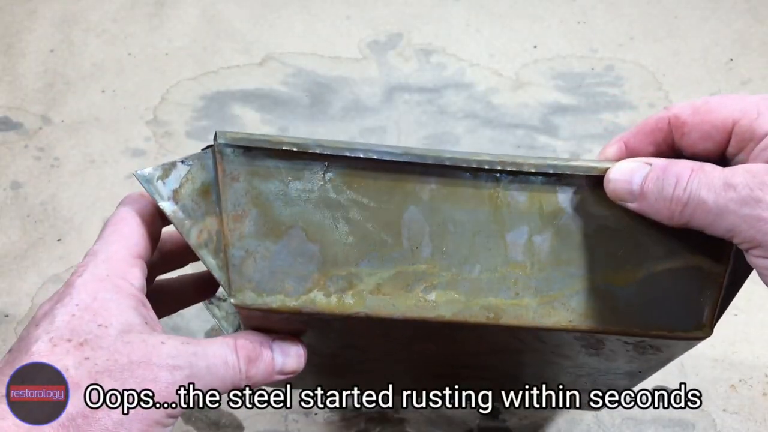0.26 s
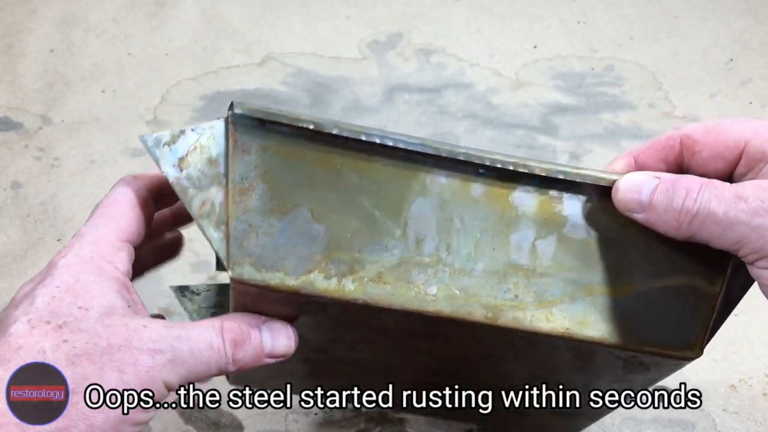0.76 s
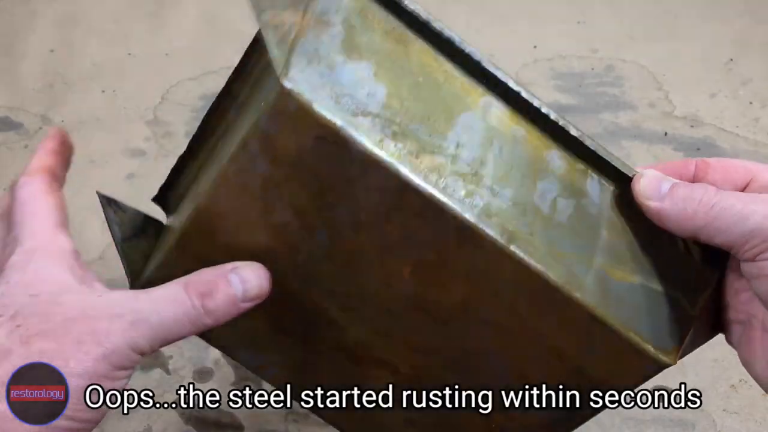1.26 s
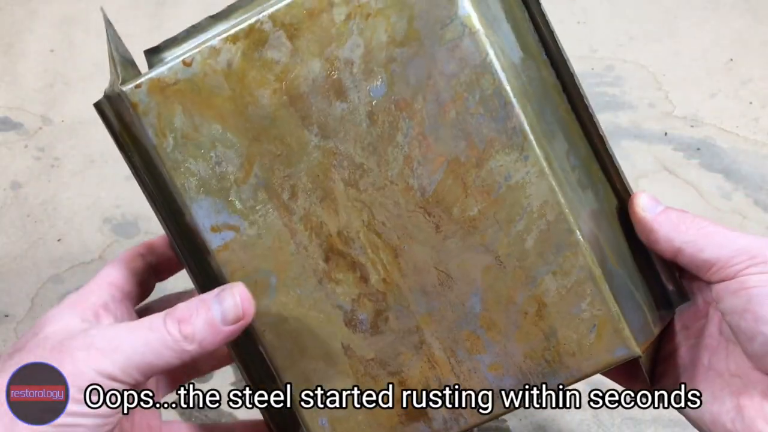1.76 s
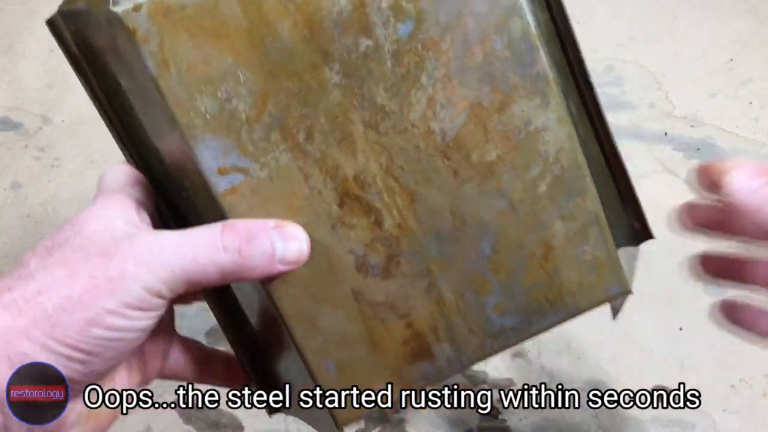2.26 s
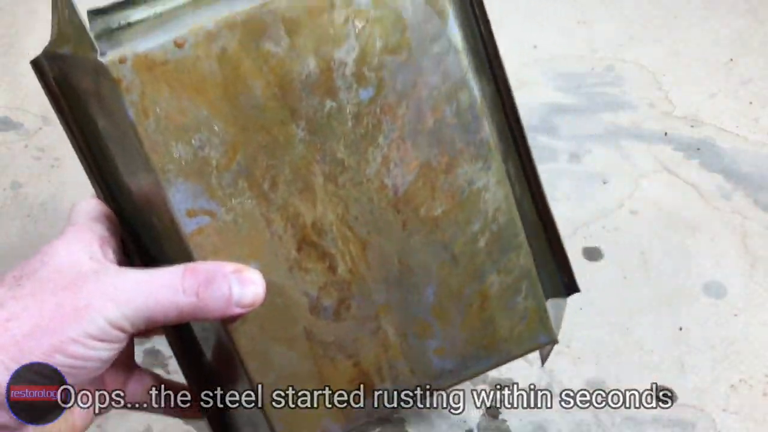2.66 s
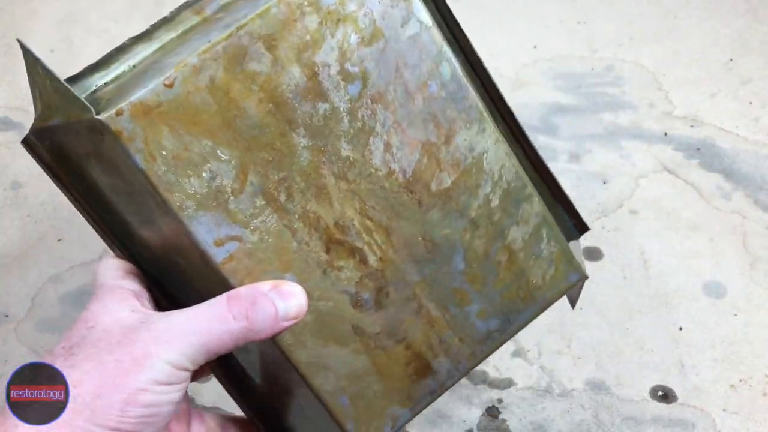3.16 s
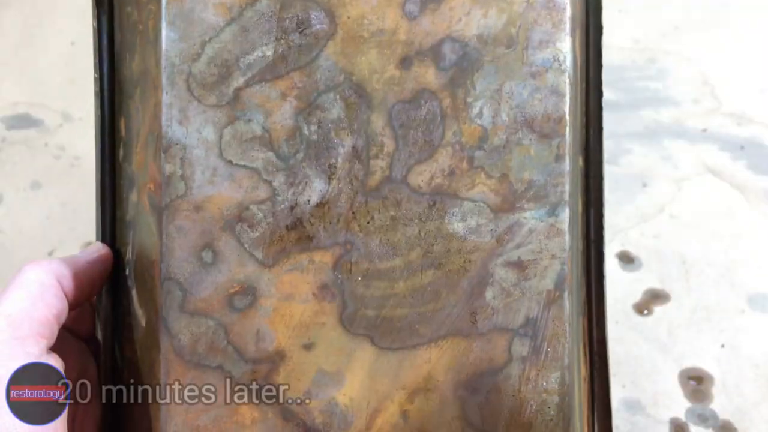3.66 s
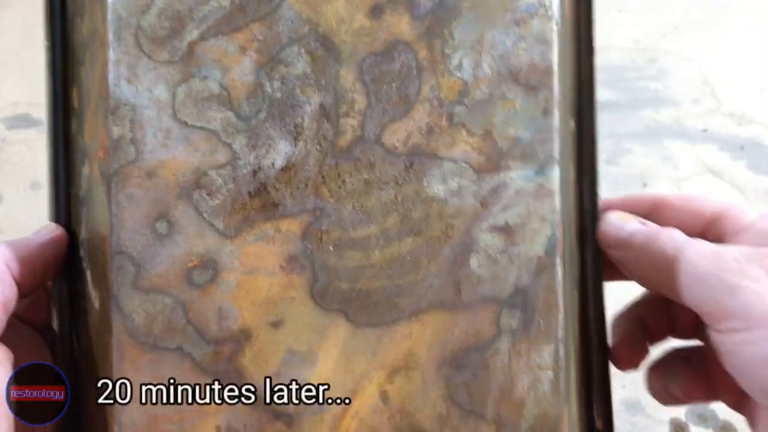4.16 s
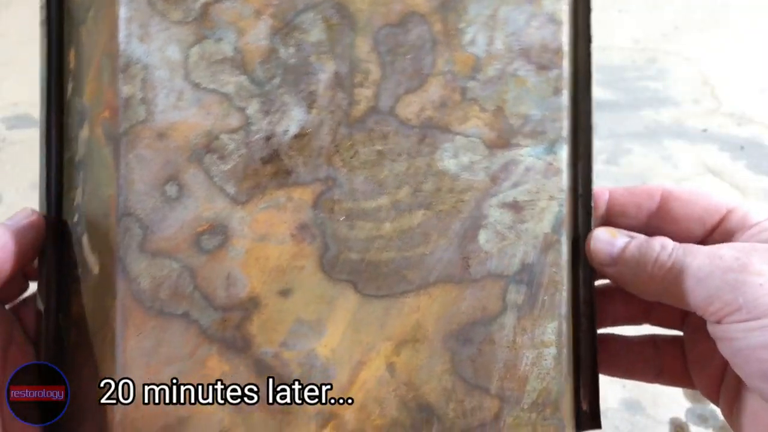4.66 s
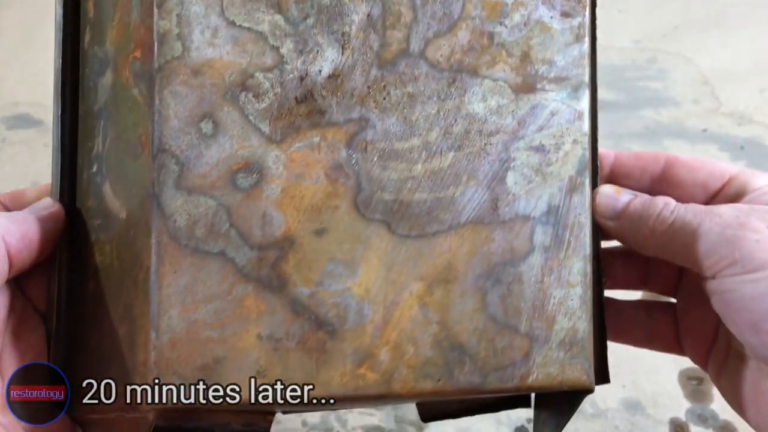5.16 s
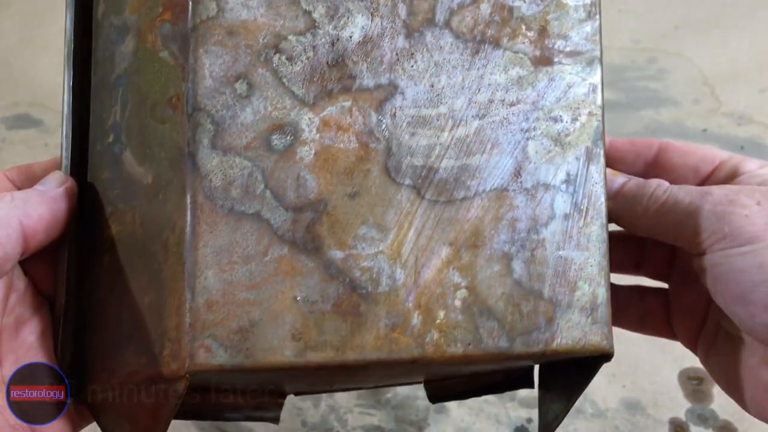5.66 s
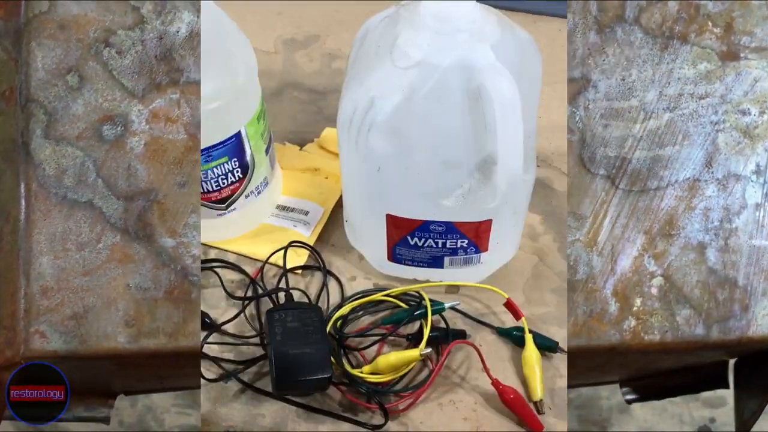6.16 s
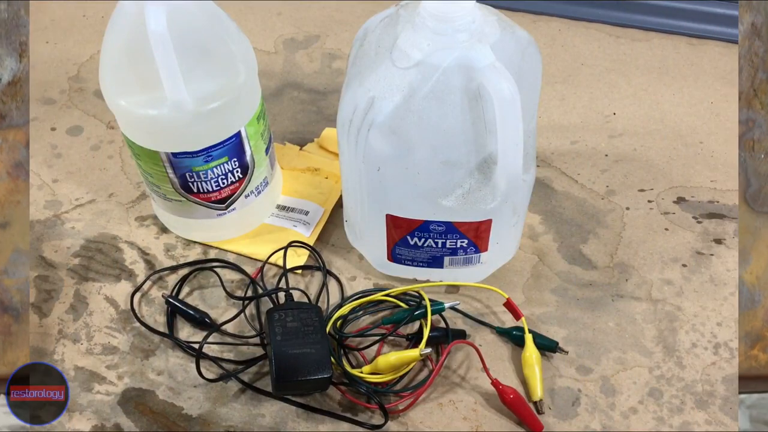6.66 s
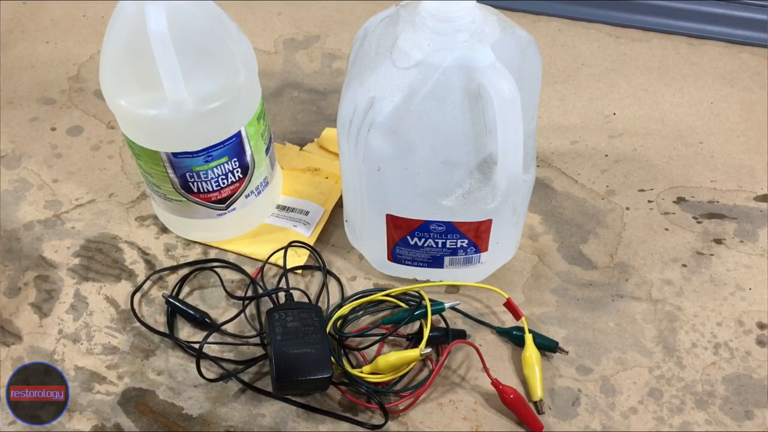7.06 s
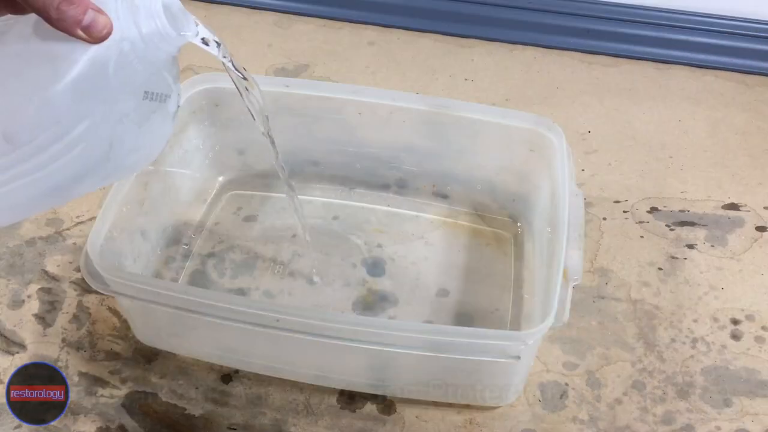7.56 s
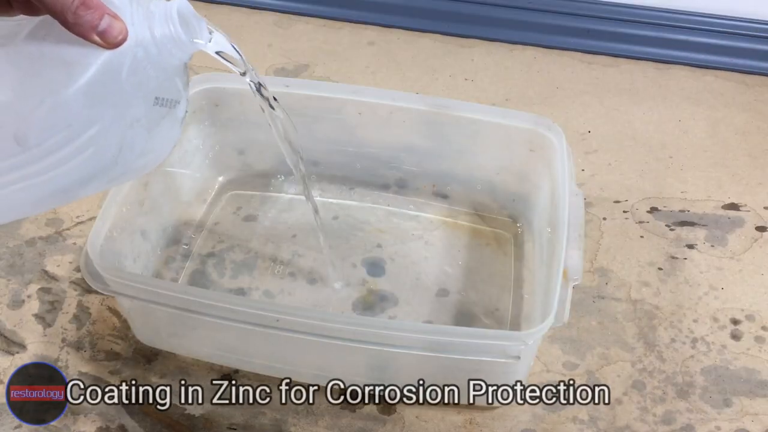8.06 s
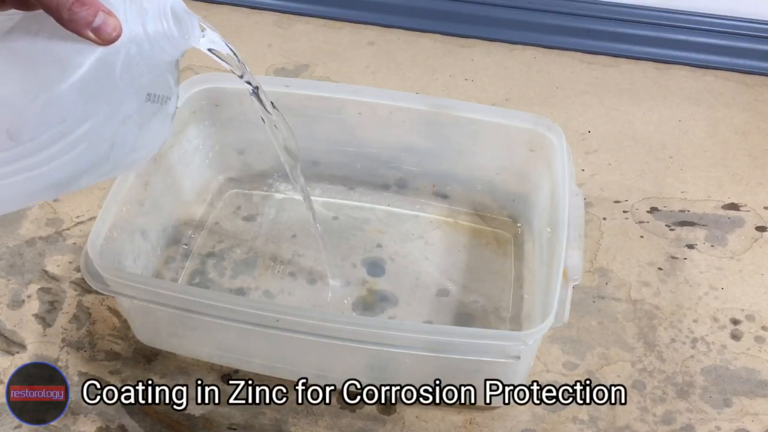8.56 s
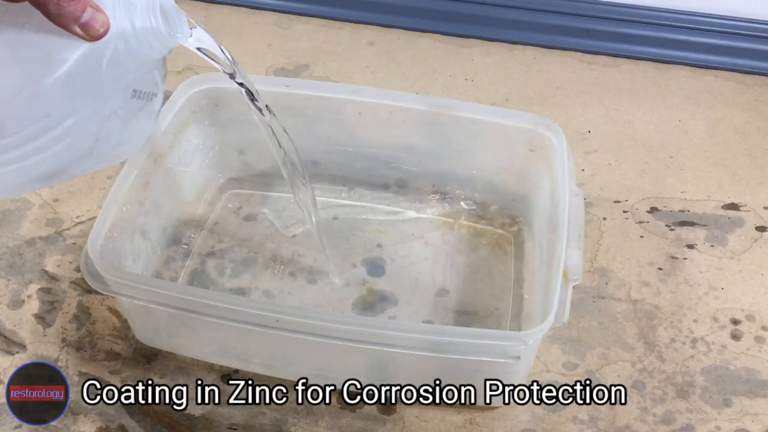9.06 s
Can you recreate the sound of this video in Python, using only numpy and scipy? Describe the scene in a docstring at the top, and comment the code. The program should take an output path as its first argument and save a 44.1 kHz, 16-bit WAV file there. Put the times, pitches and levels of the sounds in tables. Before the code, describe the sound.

From 0 to 3.5 seconds, a heavy engine idle outside booms through workshop walls, beating unevenly and slowly rising in speed. A thin, fluttering motor whine near one kilohertz sits above it, and soft hiss brightens around 1.9. A light finger rub comes at 2.8; faint high whistles, a tap and a short squeaky rub follow at 3.05-3.5. A sharp tick and hard cut then leave a much fainter, faster, steadier rumble with hum. Fingers tap the pan lightly at 4.1 and knock it in a dull metallic cluster at 4.3, with small rubs until 4.75. Tiny ticks occur at 5.4 and 6.35. From 6 to 7.4 the engine dissolves into low humming room tone, with barely audible whistles near 7. At 7.5 water begins pouring softly into a plastic tub, gurgling at 7.7, plinking around 8.1, quieter afterwards, then splashing more from 8.9 to 9.3.

```python
"""An engine idles outside a workshop, booming through the walls as a sum of harmonics of its cycle rate.
Three scenes: the idle creeps up while a steel pan is turned in the hands and a small motor whines;
the idle is faster and fainter; water is poured into a plastic tub, with plinks from ringing bubbles.
Fingers knock and rub the pan (damped modes, noise bursts) on both sides of the first, hard cut.
Shaped noise gives room hiss and stream; sine lines give whine, hum and thin whistles."""
import sys
import numpy as np
from scipy import signal
from scipy.fft import rfft, irfft
from scipy.io import wavfile
from scipy.ndimage import uniform_filter1d

SR = 44100
rng = np.random.default_rng(int(sys.argv[2]) if len(sys.argv) > 2 else 0)


def store_wav(level_fs):
    """Save 16-bit WAV to argv[1]."""
    pcm = np.round(np.clip(np.atleast_2d(level_fs), -1, 1) * 32767)
    wavfile.write(sys.argv[1], SR, pcm.T.astype(np.int16))


N = 410130
TIME = np.arange(N) / SR
POUR_S = 7.47  # pouring begins


def gain_of(db):
    """Decibels to amplitude gain."""
    return 10 ** (np.asarray(db) / 20)


def evened(x):
    """Scales to rms 1."""
    return x / np.sqrt(np.mean(x ** 2) + 1e-20)


def level(points):
    """Gain over time, interpolated in dB from (t/s, level/dB) rows."""
    return gain_of(np.interp(TIME, *np.transpose(points)))


def ramp(start_s, length_s):
    """Straight line from 0 to 1."""
    return np.clip((TIME - start_s) / length_s, 0, 1)


def add(mix, start_s, sound):
    """Mixes a sound in at a time, in place."""
    part = mix[round(start_s * SR):][:len(sound)]
    part += sound[:len(part)]


def drift(rate_hz):
    """Low-passed noise of rms 1: slow random variation."""
    knots = TIME[::128]
    hz = np.fft.rfftfreq(len(knots), knots[1])
    spectrum = rfft(rng.standard_normal(len(knots))) / (1 + (hz / rate_hz) ** 4)
    return np.interp(TIME, knots, evened(irfft(spectrum, len(knots))))


def band(x, centre_hz, octaves):
    """Bell-shaped band of x (standard deviation in octaves), at rms 1."""
    hz = np.fft.rfftfreq(len(x), 1 / SR) + 1
    bell = np.exp(-.5 * (np.log2(hz / centre_hz) / octaves) ** 2)
    return evened(irfft(rfft(x) * bell, len(x)))


def tone(hz, wander_hz, waver_db):
    """Sine line of rms 1 that wanders in pitch and strength."""
    turns = np.cumsum(hz + wander_hz * drift(10.6)) / SR
    return evened(np.sin(2 * np.pi * turns) * gain_of(waver_db * drift(9.2)))


def patter(per_s, spread_db, centre_hz, octaves, size=N):
    """Random rain of tiny impacts of unequal size and either sign, band-shaped to rms 1."""
    strength = gain_of(spread_db * np.minimum(rng.exponential(1, size), 4))
    impacts = (rng.random(size) < per_s / SR) * strength
    return band(impacts * rng.choice([-1, 1], size), centre_hz, octaves)


def room(x, wet_db, t60_s):
    """Direct sound plus sparse random reflections that decay exponentially."""
    t = np.arange(SR // 2) / SR
    hits = (rng.random(len(t)) < 4000 / SR) * (t > .002)  # 4000 per s, after 2 ms
    taps = rng.standard_normal(len(t)) * hits * gain_of(-60 * t / t60_s)
    return x + gain_of(wet_db) * signal.oaconvolve(x, taps / np.linalg.norm(taps))[:N]


def air(spectrum, patchy_db):
    """Room noise of rms 1 with a given spectrum and faint drifting patches."""
    hz, _, z = signal.stft(rng.standard_normal(N), SR, nperseg=4096)
    f, db = np.transpose(spectrum)
    patches = uniform_filter1d(rng.standard_normal(z.shape), size=5, axis=1)
    patches = evened(uniform_filter1d(patches, size=12, axis=0))
    colour_db = np.interp(np.log(hz + 1), np.log(f), db)[:, None]
    shaped = z * gain_of(colour_db + patchy_db * patches)
    return evened(signal.istft(shaped, SR, nperseg=4096)[1][:N])


def reflected_hiss():
    """Room hiss brightens while the pan's flat base reflects it: a noise band swells and fades."""
    middle_s, half_length_s, peak_db = 1.9, 0.83, -68.5
    facing = np.exp(-((TIME - middle_s) / half_length_s) ** 2)
    return gain_of(peak_db) * facing * band(rng.standard_normal(N), centre_hz=5200, octaves=0.28)


def hum(far_gain, tub_gain):
    """Mains and fan lines whose balance differs between the second scene and the third."""
    # hum lines: f/Hz, level in second scene/dB, level in third scene/dB
    lines = [(119.2, -57, -50.5), (342, -59, -64), (677, -78.5, -71), (1027, -74, -75.5),
             (1248, -76.5, -74), (2083, -79.5, -77)]
    out = np.zeros(N)
    for hz, far_db, tub_db in lines:
        gain = far_gain * gain_of(far_db) + tub_gain * gain_of(tub_db)
        out += gain * tone(hz, wander_hz=1.35, waver_db=2.5)
    return out


def whistles():
    """Thin, faint whistles that swell, flicker and glide."""
    # whistles: t/s, length/s, level before flicker/dB, start f/Hz, end f/Hz
    glides = [(3.05, .2, -73, 11900, 11500), (3.27, .07, -70.5, 12100, 11500),
              (6.79, .17, -82, 11100, 10400), (6.78, .38, -85, 13200, 13200),
              (6.98, .18, -79, 10400, 11000), (7.145, .05, -79, 12800, 11100)]
    waver_hz = 170
    out = np.zeros(N)
    for start_s, length_s, db, start_hz, end_hz in glides:
        u = np.linspace(0, 1, int(length_s * SR))
        hz = start_hz + (end_hz - start_hz) * u + waver_hz * drift(120)[:len(u)]
        swell = np.sin(np.pi * u) * gain_of(db + 3.5 * drift(50)[:len(u)])
        add(out, start_s, swell * np.sin(2 * np.pi * np.cumsum(hz) / SR))
    return out


def whine():
    """Motor partials, shaded and reflected by the turning pan, with a fast common flutter."""
    # fundamental: t/s, level/dB
    fundamental_db = [(0, -61), (.22, -70), (.58, -55.5), (.92, -54.5), (1.04, -62), (1.42, -57.5),
                      (2.1, -66), (2.4, -62), (2.58, -54), (2.7, -61), (3.08, -62), (3.18, -52.5),
                      (3.32, -63), (3.46, -57)]
    # second harmonic: t/s, level/dB
    octave_db = [(0, -69), (.8, -71), (1, -63.5), (1.9, -63.5), (2.4, -67), (3.5, -67)]
    # third harmonic: t/s, level/dB
    twelfth_db = [(0, -70), (.38, -64.5), (.9, -73), (1.95, -69), (2.24, -61.5), (2.6, -69), (3.5, -67.5)]
    # steady side partials: f/Hz, relative level/dB
    side_partials = [(665, -69.5), (4077, -80)]
    whine_hz, shrill_hz = 1021, 6105
    open_db, shaded_db, turn_s, turn_length_s = -64.5, -79.5, 0.44, 1
    fundamental = level(fundamental_db) * tone(whine_hz, wander_hz=4, waver_db=2.2)
    octave = level(octave_db) * tone(2 * whine_hz, wander_hz=7, waver_db=2.8)
    twelfth = level(twelfth_db) * tone(3 * whine_hz, wander_hz=18, waver_db=2.2)
    sides = sum(gain_of(db + 5.5) * tone(hz, wander_hz=12, waver_db=0.0) for hz, db in side_partials)
    # the shrill partial is shaded as the pan turns away
    shrill_db = open_db + (shaded_db - open_db) * ramp(turn_s, turn_length_s)
    shrill = gain_of(shrill_db) * tone(shrill_hz, wander_hz=14, waver_db=1.5)
    flutter = 1 + .4 * drift(22)
    return flutter * (fundamental + octave + twelfth + sides + shrill)


def knock(ring_db, tick_db):
    """Finger on damped steel: a tick, a dull thud and a short ring of beating mode pairs."""
    # pan modes: f/Hz, relative level/dB, t60/s
    modes = [(330, -1, 0.15), (401, -3, 0.25), (490, 0, .12), (630, 2, 0.12), (708, -4, 0.2), (835, -6, .2),
             (980, -4.5, .22), (1090, -5, .18), (1510, -2, 0.1), (1610, -3, .11), (1790, -6, 0.092),
             (2060, -7, 0.12), (2800, -4.5, 0.12), (3100, -9.5, 0.15), (3700, -10, .09)]
    pair_split = .03  # greatest offset of each partner, as a share of the mode's pitch
    t = np.arange(SR // 2) / SR
    ring = np.zeros(len(t))
    for hz, db, t60_s in modes:
        for side in (-1, 1):
            mode_hz = hz * (1 + side * pair_split * rng.random())
            ring += gain_of(db - 60 * t / t60_s) * np.sin(2 * np.pi * (mode_hz * t + rng.random()))
    thud = band(rng.standard_normal(len(t)), centre_hz=560, octaves=.85) * gain_of(2.0 - 60 * t / 0.098)
    tick = band(rng.standard_normal(len(t)), centre_hz=3400, octaves=0.7) * gain_of(.5 - 60 * t / 0.016)
    return gain_of(ring_db - 4.0) * (ring + thud) + gain_of(tick_db) * tick


def rub(length_s, db, centre_hz, octaves):
    """Skin slides and squeaks on steel: a swelling rain of tiny slips."""
    stroke = np.hanning(int(length_s * SR))
    slips = patter(per_s=1600, spread_db=3, centre_hz=centre_hz, octaves=octaves, size=SR)
    return gain_of(db) * stroke * slips[:len(stroke)]


def pan():
    """Fingers knock the pan and slide over it; the room answers."""
    # knocks: t/s, relative ring level/dB, relative tick level/dB
    knocks = [(3.249, -52, -60), (3.462, -54, -50), (4.117, -67, -56.5), (4.272, -45, -49),
              (4.276, -54, -54), (4.284, -52, -55), (4.303, -55, -60), (4.367, -59, -62), (4.382, -58, -62),
              (5.382, -81, -52.5), (6.3505, -86.5, -52)]
    # rubs: t/s, length/s, level/dB, centre f/Hz, width/octaves
    rubs = [(2.811, .062, -52.5, 3400, .3), (2.813, 0.054, -58.5, 9200, .55), (3.29, 0.13, -57, 2600, .5),
            (3.38, 0.07, -46.5, 1750, 0.69), (3.408, .046, -39.5, 1360, 0.32),
            (3.425, 0.072, -47.5, 1300, 0.53), (3.392, 0.1, -60, 5000, .9), (4.29, .11, -58, 1010, 0.11),
            (4.315, .15, -52, 517, 0.39), (4.34, 0.056, -63, 3000, 0.65), (4.55, 0.067, -65, 4970, 0.7),
            (4.696, 0.058, -66, 6000, .8)]
    out = np.zeros(N)
    for start_s, ring_db, tick_db in knocks:
        add(out, start_s, knock(ring_db, tick_db))
    for start_s, length_s, db, centre_hz, octaves in rubs:
        add(out, start_s, rub(length_s, db, centre_hz, octaves))
    return room(out, wet_db=-6.5, t60_s=0.19)


def stream():
    """The stream patters softly, splashes and sprays more where it breaks up, and the jug gurgles at first."""
    # surges: middle t/s, half-length/s, splash level/dB, spray level/dB
    surges = [(7.61, .05, -86, -82), (7.744, .025, -75, -74), (7.908, 0.0062, -63, -70),
              (9.105, 0.048, -67, -77), (9.275, 0.082, -62, -62.5)]
    gurgle_s, gurgle_db, rise_db_per_s, fall_db_per_s = 7.72, -51.5, 50, 52
    splash, spray = gain_of(-71.5), gain_of(-95)  # smooth stream
    for middle_s, half_length_s, splash_db, spray_db in surges:
        surge = np.exp(-((TIME - middle_s) / half_length_s) ** 2)
        splash = splash + gain_of(splash_db) * surge
        spray = spray + gain_of(spray_db) * surge
    below_peak_db = np.maximum(rise_db_per_s * (gurgle_s - TIME), fall_db_per_s * (TIME - gurgle_s))
    gurgle = gain_of(gurgle_db - below_peak_db)
    out = spray * patter(per_s=900, spread_db=6, centre_hz=13200, octaves=0.66)
    out += splash * patter(per_s=1800, spread_db=2.5, centre_hz=3200, octaves=0.68)
    out += gurgle * patter(per_s=300, spread_db=3.5, centre_hz=316, octaves=0.58)
    return ramp(POUR_S, 0.12) * out


def drop(hz, t60_s, splash):
    """A drop snaps and traps a bubble that swells over a cycle or two, rings and rises in pitch."""
    rise_per_s, attack_cycles = 8, 1.3  # rise as a share of the pitch, until t60
    t = np.arange(SR // 8) / SR
    splash = np.clip(splash, 0, 1)
    bubble = np.sin(2 * np.pi * np.cumsum(hz * (1 + rise_per_s * np.minimum(t, t60_s))) / SR)
    snap = 0.73 * band(rng.standard_normal(len(t)), hz, octaves=0.34)
    shape = (1 - np.exp(-t * hz / attack_cycles)) * gain_of(5.5 - 60 * t / t60_s)
    return shape * ((1 - splash) * bubble + splash * snap)


def slap():
    """Dull, wide-band tap of a droplet landing: decaying noise."""
    t = np.arange(SR // 8) / SR
    return gain_of(-13 - 60 * t / 0.0062) * band(rng.standard_normal(len(t)), centre_hz=5500, octaves=1)


def water():
    """Stream, trapped bubbles and droplets spitting on plastic; the tub walls and the room answer."""
    # bubbles: t/s, relative level/dB, f/Hz, t60/s, splash noise weight/1
    bubbles = [(7.625, -49.5, 2300, .018, 0.94), (7.648, -46, 2230, .019, 0.93),
               (7.665, -55, 5400, .012, .6), (8.0507, -43.5, 4000, 0.0093, 0.33),
               (8.057, -39.5, 1720, 0.017, .05), (8.082, -43, 2450, 0.058, 0.51),
               (8.086, -48, 2980, 0.028, 0.22), (8.1626, -31, 4560, 0.0069, 0.28),
               (8.162, -43, 5190, 0.013, 0.57), (8.194, -47, 7300, .012, .1), (8.214, -56, 6700, .01, .3),
               (8.904, -35.5, 3300, 0.011, .02), (9.1236, -42.5, 1382, 0.062, .03),
               (9.105, -45, 3700, 0.013, 0.64), (9.213, -48, 1900, 0.058, 0.75),
               (9.2576, -40, 4700, 0.034, 0.46), (9.267, -49, 2500, 0.022, 0.36)]
    # spits: t/s, relative level/dB, centre f/Hz
    spits = [(7.5612, -34.5, 11850), (7.571, -47, 11500), (7.7457, -51, 12500), (7.8, -40.5, 12800),
             (7.812, -51, 12700), (7.825, -55, 12000), (7.905, -48, 14000), (7.908, -51, 10500),
             (7.918, -44, 12800), (7.925, -49, 12000), (7.9507, -51, 13800), (8.068, -52, 12100),
             (8.287, -59, 12000), (8.322, -55, 8500), (8.3658, -52, 12500), (8.753, -56, 12900),
             (8.8546, -53, 10500), (8.923, -46, 9600), (9.0872, -38.5, 12500), (9.105, -48, 10100),
             (9.1195, -48, 8000), (9.133, -54, 13500), (9.166, -53, 6000), (9.192, -52.5, 8900),
             (9.224, -49, 7460), (9.2645, -52, 13800)]
    out = stream()
    for start_s, db, hz, t60_s, splash in bubbles:
        add(out, start_s, gain_of(db) * drop(hz, t60_s, splash))
    for start_s, db, hz in spits:
        add(out, start_s, gain_of(db) * (drop(hz, t60_s=0.009, splash=0.64) + slap()))
    in_tub = room(out, wet_db=-10.0, t60_s=0.027)
    return room(in_tub, wet_db=-11.5, t60_s=0.17)


def order_line(turns, multiple):
    """One engine order at rms 1; walls delay higher orders, smearing the firings, and phase strays."""
    lag_turns = multiple ** 2 / 11.4
    stray_turns = .003 * multiple * drift(1)
    # the bracket is in turns
    return np.sqrt(2) * np.sin(2 * np.pi * (multiple * turns - lag_turns + stray_turns))


def standing_waves(hz):
    """Room gain at low frequencies: bell-shaped peaks and dips, summed in dB."""
    # standing waves: f/Hz, width/Hz, level/dB
    waves = [(52.9, 1.1, -18), (59.3, .9, -21), (63, 1.4, 4.5), (67.2, .35, -8), (73.4, .8, -13),
             (82.6, .9, -17), (91.6, 2, 7.5), (94.3, .7, -5), (102.7, .6, -12), (108.8, 1.8, 4.5),
             (113.5, 1.5, -4), (165, 1.3, -13), (196, 6, 3.3), (205.5, 1.2, -4)]
    return gain_of(sum(db * np.exp(-.5 * ((hz - centre) / width) ** 2) for centre, width, db in waves))


def far_engine():
    """The same rumble at a faster, fainter idle that swells slowly."""
    # orders: multiple of the cycle rate/1, level before swell/dB
    orders = [(6, -52), (9, -48), (10, -51), (11, -47), (12, -42), (13, -48), (14, -47), (15, -39),
              (16, -54), (17, -60), (20, -67), (24, -70), (25, -68), (26, -60), (27, -65), (28, -65),
              (29, -68), (30, -65), (38, -71), (40, -66), (42, -70), (43, -67), (44, -60)]
    # swell: t/s, level/dB
    swell = [(3.5, 2), (4.1, -2), (4.8, 0.5), (5.3, 2.5), (6.1, -1.5)]
    cycle_hz = 7.417
    turns = np.cumsum(cycle_hz * (1 + .001 * drift(4))) / SR
    return level(swell) * sum(gain_of(db) * order_line(turns, k) for k, db in orders)


def near_engine():
    """Unequal cylinders sound multiples of the rising cycle rate, beating and sliding through room modes."""
    # orders: multiple of the cycle rate/1, level before room gain and drift/dB
    orders = [(6, -44), (7, -53), (8, -56), (9, -40), (10, -37), (11, -30.5), (12, -16.9), (13, -26.5),
              (14, -32.5), (15, -26), (16, -46), (17, -39.5), (18, -35), (19, -46), (20, -45), (21, -47),
              (24, -58), (27, -48), (28, -46), (29, -55), (30, -51), (31, -44.5), (32, -43.5), (33, -41.5),
              (34, -44.5), (35, -51), (36, -55), (37, -59), (48, -60), (49, -58), (50, -58), (53, -62),
              (55, -62)]
    idle_hz, creep_hz_per_s, first_firing_s = 5.81, .169, .046
    late_order, late_db, late_s = 13, -20, 1.0  # this order starts weak and swells in
    cycle_hz = idle_hz + creep_hz_per_s * TIME
    turns = np.cumsum(cycle_hz * (1 + .0015 * drift(5))) / SR - idle_hz * first_firing_s
    coarse = slice(None, None, 512)
    out = np.zeros(N)
    for k, db in orders:
        boom = np.interp(TIME, TIME[coarse], standing_waves(k * cycle_hz[coarse]))
        swell_db = late_db * (1 - ramp(0, late_s)) if k == late_order else 0
        strength = gain_of(db + swell_db + 0.062 * k * drift(0.98))
        out += boom * strength * order_line(turns, k)
    return out


def scene():
    """Hard cut with a tick after the first scene, slow dissolve to the third, step up at the pouring."""
    # room noise of each scene: f/Hz, relative density/dB
    near_air = [(20, -9.5), (70, 4.5), (130, 6.5), (250, -6), (330, -2), (420, -7), (530, -17.5),
                (1000, -16.5), (1700, -21), (4400, -26.5), (6800, -32), (7500, -37.5), (9500, -40),
                (11000, -47), (15000, -50)]
    far_air = [(15, -55), (45, 13), (100, 6.5), (150, -7), (320, -8.5), (500, -19.5), (1100, -24.5),
               (2200, -28), (4200, -35.5), (5200, -42), (9000, -39.5), (10500, -50), (15000, -48)]
    tub_air = [(15, -9), (40, 14.5), (72, 15), (100, 2), (220, -5.5), (320, -3.5), (520, -16.5),
               (1200, -19), (2200, -23), (4000, -28.5), (5200, -39), (9000, -33.5), (10500, -42),
               (15000, -45)]
    cut_s = 3.495
    dissolve = ramp(start_s=5.994, length_s=1.43)
    far_gain = (1 - dissolve) ** 1.65
    tub_gain = dissolve * gain_of(-3.5 * (1 - ramp(POUR_S, 0.033)))  # lower until the pouring
    first = near_engine() + whine() + reflected_hiss() + gain_of(-40) * air(near_air, patchy_db=2.26)
    second = far_engine() + gain_of(-42) * air(far_air, patchy_db=1.6)
    third = gain_of(-41.5) * air(tub_air, patchy_db=2.0)
    later = far_gain * second + tub_gain * third + hum(far_gain, tub_gain)
    cut = ramp(cut_s, .002)
    mix = first * (1 - cut) + later * cut + pan() + whistles() + water()
    add(mix, cut_s, gain_of(-24.5) * np.exp(-TIME[:SR // 100] / .00007))  # tick
    return mix[None]


def record(dry):
    """Band limit: linear-phase low-pass."""
    lowpass = signal.firwin(511, 15550, window=("kaiser", 9), fs=SR)  # edge in Hz
    return signal.oaconvolve(dry, lowpass[None], "same")


dry = scene()
out = record(dry)
store_wav(out)
```